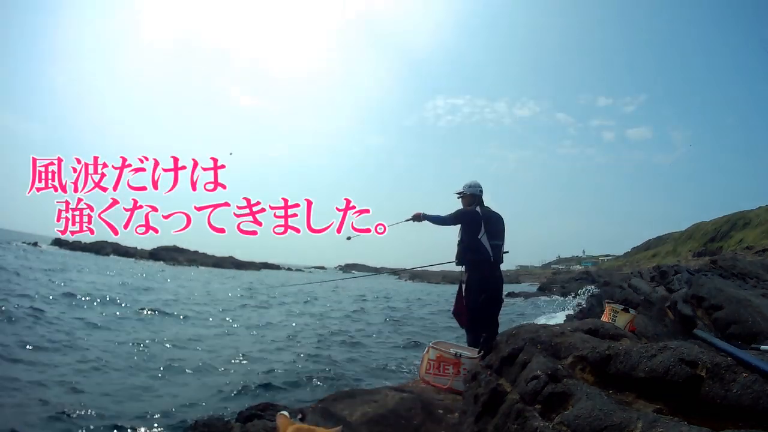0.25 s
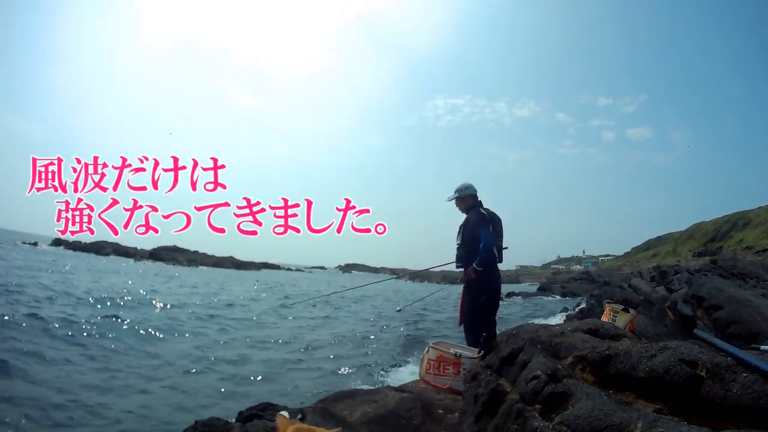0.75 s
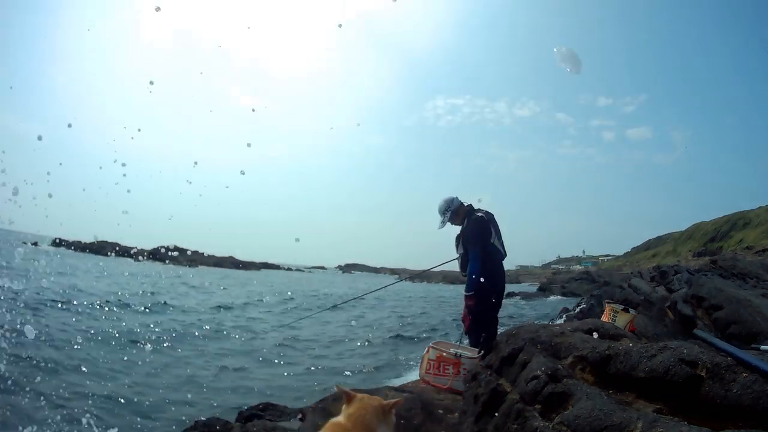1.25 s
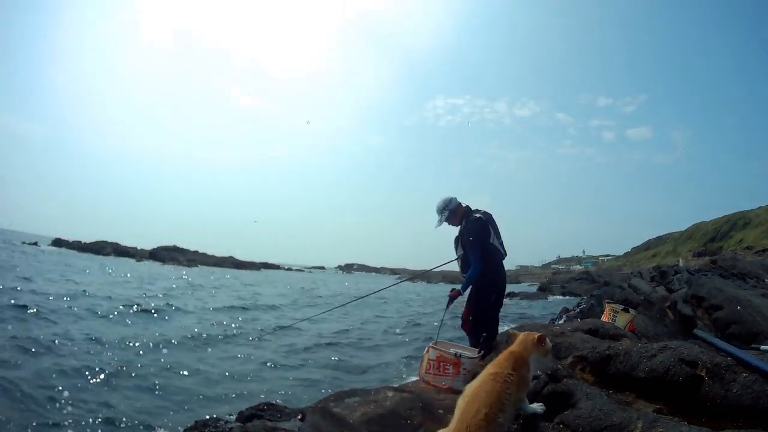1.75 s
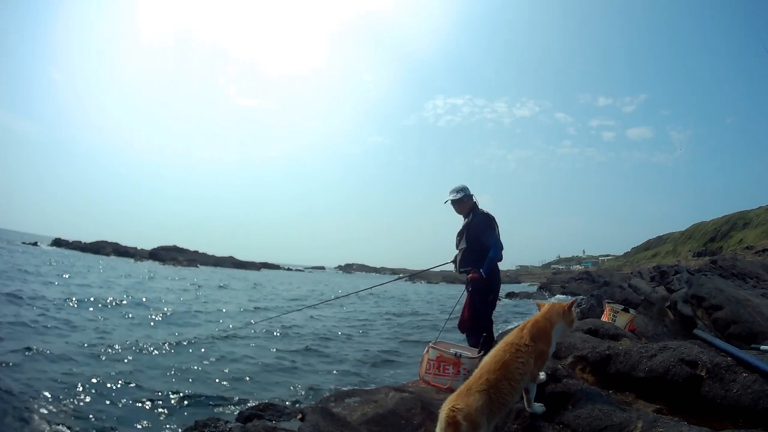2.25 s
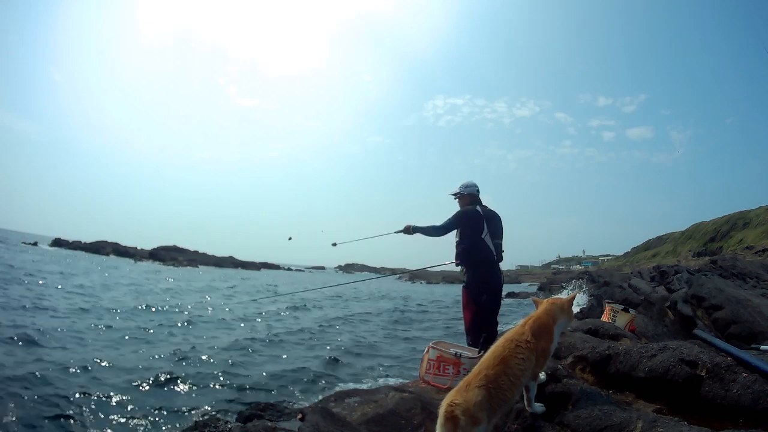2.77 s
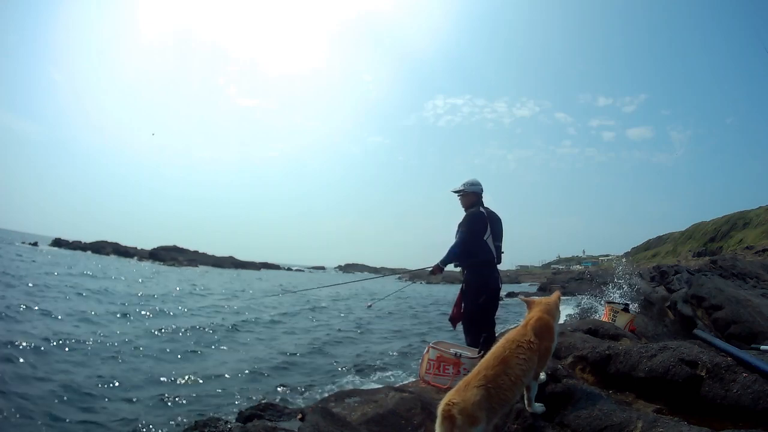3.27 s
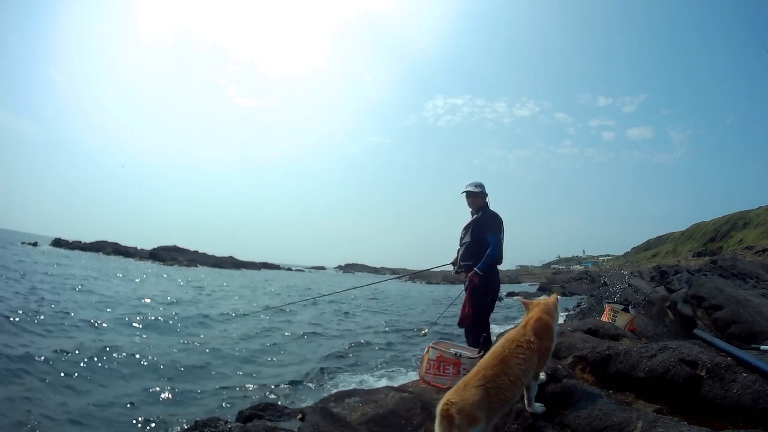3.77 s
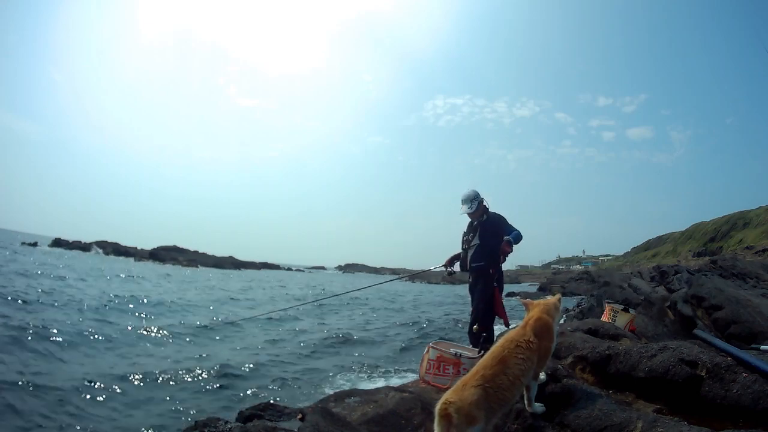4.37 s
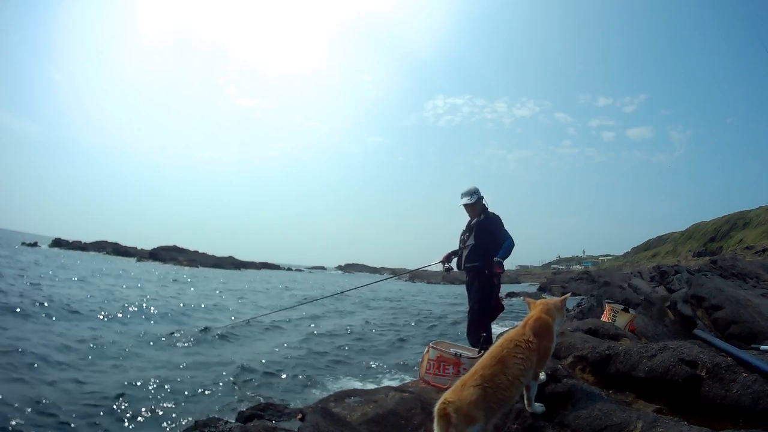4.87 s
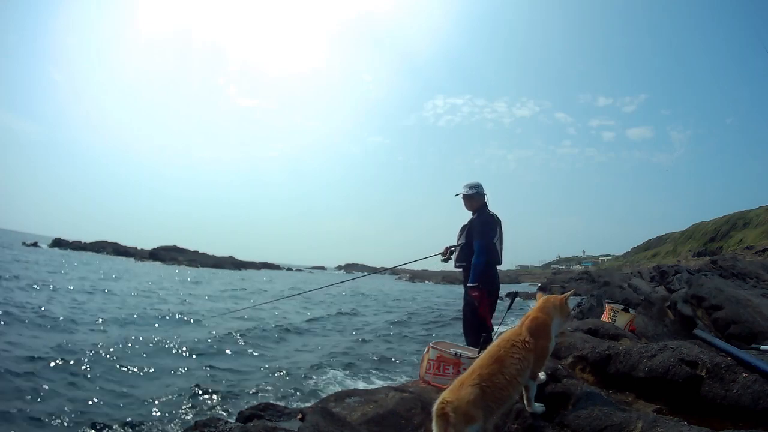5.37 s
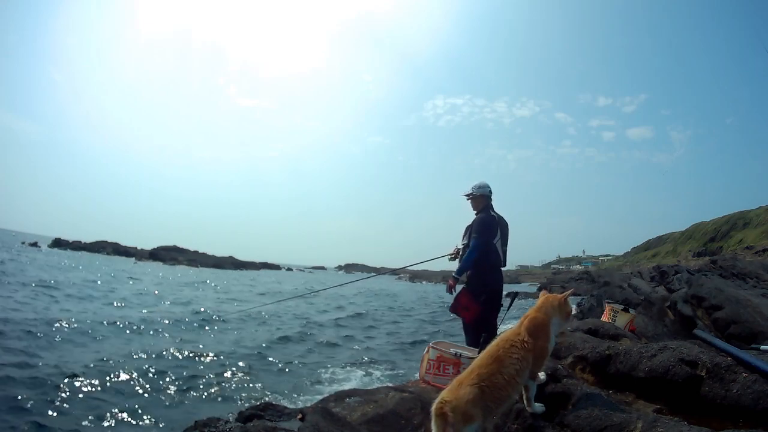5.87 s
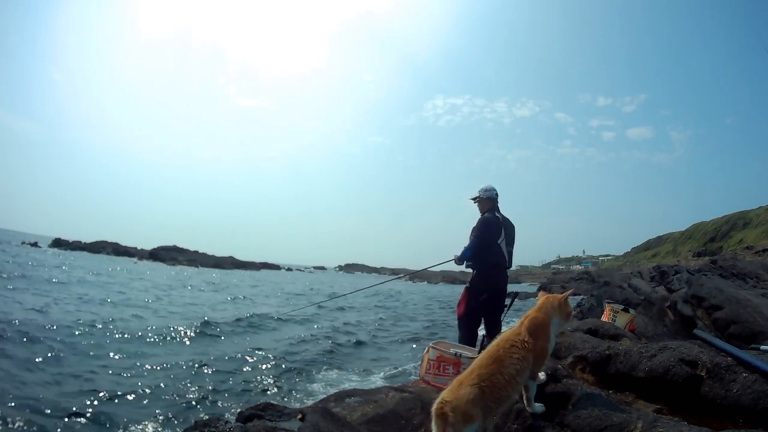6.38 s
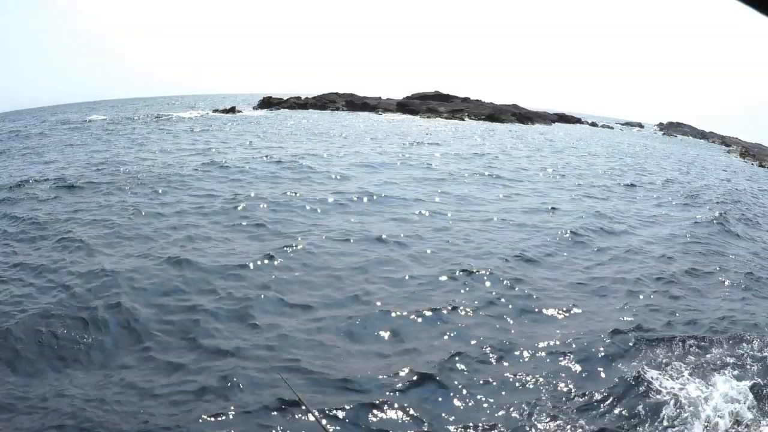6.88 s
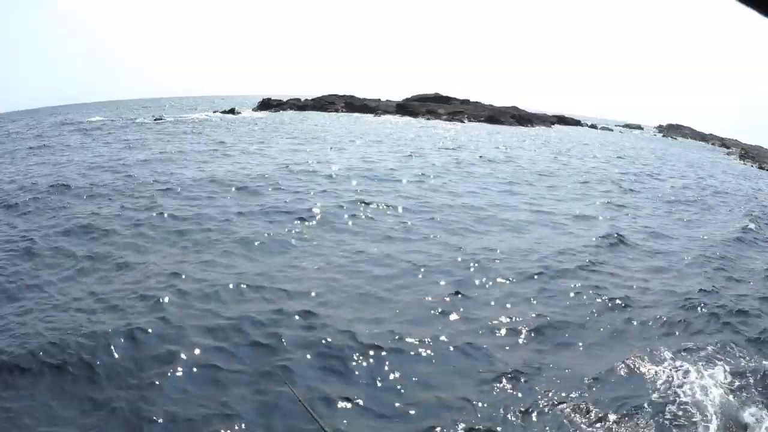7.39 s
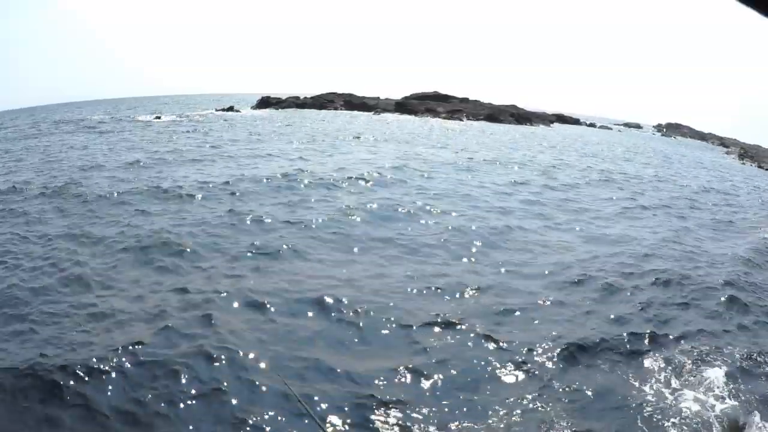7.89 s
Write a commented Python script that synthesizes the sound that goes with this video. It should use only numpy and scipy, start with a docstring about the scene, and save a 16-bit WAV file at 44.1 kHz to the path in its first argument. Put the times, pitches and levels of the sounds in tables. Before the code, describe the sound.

Wind rumbles on the microphone as surf roars in and slaps against rocks, followed by a brief shower of droplets landing nearby. The foamy wash slowly ebbs, with soft hollow gulps among the rocks, and fades away completely. A lighter, farther sound of open sea takes over, with small waves lapping, a few close drops and a growing foam hiss.

```python
"""A rocky shore in the wind, then choppy open water. Bubble clouds roar as a big wave surges up the
rocks and drains, while foam hisses above and wind rumbles on the microphone. Waves slap the rock,
air trapped in its hollows booms, and spray patters down nearby. The shore fades to silence, and the
open water fades in, thinner and more distant. Each place has its own microphone colour."""
import sys
import numpy as np
from scipy import signal
from scipy.fft import rfft, irfft
from scipy.io import wavfile

SR = 44100
rng = np.random.default_rng(int(sys.argv[2]) if len(sys.argv) > 2 else 0)


def materialize(psi):
    """Save the field psi as 16-bit PCM at rate SR to the path in sys.argv[1].

    A 1-D psi becomes a single channel; in a 2-D psi each row is a channel.
    """
    bounded = np.clip(np.atleast_2d(psi).T, -1, 1)
    quanta = np.round(bounded * 32767).astype(np.int16)
    wavfile.write(sys.argv[1], SR, quanta)


N = 358974
TIME = np.arange(N) / SR
LAP_FOAM_SHARE = 0.61  # share of a lap's lift in dB that its foam takes

# Small crests spilling into foam. Each row: peak time in seconds, level in dB, half length in seconds.
CRESTS = [(.59, -40, 0.031), (1.05, -35.5, 0.055), (4.44, -51, .1), (5.77, -50, .07), (7.53, -47.5, 0.1),
          (7.97, -44, 0.065)]


def gain_of(db):
    """The decibel scale: 20 dB is a factor of ten in amplitude."""
    return 10 ** (np.asarray(db) / 20)


def unit_rms(x):
    """Normalisation to a mean power of one."""
    return x / np.sqrt(np.mean(x ** 2) + 1e-20)


def shaped(x, spectrum):
    """Spectral shaping: x is filtered by a curve drawn on a log-frequency axis, then set to rms 1."""
    hz, db = np.transpose(spectrum)
    bins = np.fft.rfftfreq(N, 1 / SR)
    response = gain_of(np.interp(np.log(bins + 1), np.log(hz), db))
    return unit_rms(irfft(rfft(x) * response, N))


def microphone(x, modes):
    """Resonance of the microphone's housing adds bell-shaped peaks and notches."""
    bins = np.fft.rfftfreq(N, 1 / SR)
    db = sum(height / (1 + (2 * (bins - hz) / width) ** 2) for hz, width, height in modes)
    return irfft(rfft(x) * gain_of(db), N)


def blur(field, width, axis):
    """Gaussian smoothing correlates neighbouring values of a random field; the result has rms 1."""
    size = field.shape[axis]
    bell = np.exp(-2 * (np.pi * width * np.fft.rfftfreq(size)) ** 2)
    return unit_rms(irfft(rfft(field, axis=axis) * np.expand_dims(bell, 1 - axis), size, axis=axis))


def churn(x, patch_s, patch_hz, patch_db, flicker_db, size=512):
    """Turbulent modulation: patches of the spectrum come and go, and a flicker moves all pitches at once."""
    overlap = size - size // 4
    hz, t, spectra = signal.stft(x, SR, nperseg=size, noverlap=overlap)
    frames = patch_s / t[1]
    patches = blur(rng.standard_normal(spectra.shape), frames, axis=1)
    patches = blur(patches, patch_hz / hz[1], axis=0)
    flicker = blur(rng.standard_normal((1, len(t))), frames, axis=1)
    spectra = spectra * gain_of(patch_db * patches + flicker_db * flicker)
    return signal.istft(spectra, SR, nperseg=size, noverlap=overlap)[1][:N]


def bubbles(low_hz, high_hz, cycles, spread_db, count, size=900):
    """Damped oscillation: bubbles ring and rise in pitch as they near the surface; a few are large."""
    when, pitch, large = rng.random((count, 3)).T[:, :, None]
    hz = low_hz + (high_hz - low_hz) * pitch
    turns = hz * np.arange(size) / SR
    age = turns / cycles
    strength = gain_of(spread_db * np.minimum(-np.log(1 - large), 4)) * np.sqrt(hz)
    glide = 1 + 0.019 * np.minimum(age, 4)
    rings = strength * np.exp(-age) * np.sin(2 * np.pi * turns * glide)
    at = (when * N).astype(int) + np.arange(size)
    return unit_rms(np.bincount(at.ravel(), rings.ravel(), N)[:N])


def patter(per_s, spread_db):
    """Shot noise: droplets strike at random; a wide spread makes a few much harder than the rest."""
    chance, large, sign = rng.random((3, N))
    strength = gain_of(spread_db * np.minimum(-np.log(1 - large), 4))
    return unit_rms((chance < per_s / SR) * strength * np.sign(sign - .5))


def swells(rows):
    """Gaussian envelopes add, each falling to 1/e one half length from its peak."""
    return sum(gain_of(db) * np.exp(-((TIME - s) / half) ** 2) for s, db, half in rows)


def waver(depth_db, slow_hz, fast_hz, count=24):
    """Amplitude modulation: sines of random phase add up to a wandering gain."""
    rates = np.geomspace(slow_hz, fast_hz, count)[:, None]
    t = TIME[::256]
    phases = 2 * np.pi * (rates * t + rng.random((count, 1)))
    drift = (np.sin(phases) / np.sqrt(rates)).sum(0)
    return gain_of(depth_db * np.interp(TIME, t, unit_rms(drift)))


def lap_db():
    """Superposition: the lifts that smaller waves give to the water's sound add up, in dB."""
    # Waves lapping in. Each row: peak time in seconds, lift in dB, half length in seconds.
    laps = [(0.216, 2, 0.055), (0.483, 2.5, .04), (.6, 2.5, 0.028), (.79, 1.3, 0.073), (1.135, 2.3, 0.076),
            (2.42, 0.5, .12), (3.878, 1.5, 0.14), (4.478, 1.2, 0.11), (4.948, 2, 0.35), (5.78, 1.8, 0.36),
            (6.96, 1, 0.12), (7.292, 2, 0.064), (7.466, 1.5, 0.052), (7.767, 1.5, 0.081),
            (8.097, 0.2, 0.074)]
    return sum(db * np.exp(-((TIME - s) / half) ** 2) for s, db, half in laps)


def wind(breeze_db=-40, drop_db_per_s=0.9, gust_half_s=0.058):
    """Turbulent pressure rumbles on the microphone: a slowly dropping breeze with brief gusts."""
    # Spectrum of the rumble. Each row: frequency in Hz, relative density in dB.
    rumble = [(15, -13), (30, -7.5), (50, -7.5), (64, 4), (85, -2), (140, 2.5), (210, -0.5), (320, -16.5),
              (700, -40), (3000, -74)]
    # Gusts. Each row: peak time in seconds, level in dB.
    gusts = [(.44, -44), (.77, -43), (.98, -45.5)]
    level = gain_of(breeze_db - drop_db_per_s * TIME) + swells((s, db, gust_half_s) for s, db in gusts)
    eddies = churn(rng.standard_normal(N), patch_s=0.017, patch_hz=81.7, patch_db=-0.5, flicker_db=1.35)
    return level * shaped(eddies, rumble)


def open_water(build_s=7.3, build_db_per_s=7):
    """Bubble and droplet noise: small waves lap, and as a swell builds the foam outgrows the wash."""
    # Spectra of the wash and its foam. Each row: frequency in Hz, relative density in dB.
    wash_spectrum = [(20, -36), (110, -36), (200, -28), (300, -14), (450, -5.5), (620, -0.5), (950, 3),
                     (1400, 0), (2000, -2.5), (2400, -8.5), (3200, -15), (4300, -20.5), (7000, -24),
                     (16000, -39.5)]
    foam_spectrum = [(800, -19), (2000, 12), (4000, 10.5), (7000, -0.5), (10000, -3), (12000, -14),
                     (14000, -8), (15500, -4)]
    # Microphone resonances and notches. Each row: centre in Hz, width in Hz, gain in dB.
    open_modes = [(3600, 250, -6), (4590, 300, -17), (5200, 960, -10), (5720, 430, -22), (6900, 900, 3.5),
                  (8100, 800, -8), (10000, 1500, 13), (13200, 1200, -8)]
    swell_db = build_db_per_s * np.maximum(TIME - build_s, 0)
    slosh = waver(depth_db=-0.26, slow_hz=2.3, fast_hz=10)
    wash_level = gain_of(-39 + swell_db + lap_db()) * slosh
    seething = gain_of(-53 + 1.84 * swell_db + LAP_FOAM_SHARE * lap_db()) * slosh
    foam_level = np.hypot(seething, swells(CRESTS))
    wash = rng.standard_normal(N) + gain_of(-16.5) * bubbles(394, 4180, cycles=6.7, spread_db=3, count=2500)
    wash = churn(wash, patch_s=0.026, patch_hz=252, patch_db=1.5, flicker_db=0.36)
    froth = rng.standard_normal(N) + gain_of(-7) * patter(per_s=610, spread_db=4)
    froth = churn(froth, patch_s=0.0074, patch_hz=800, patch_db=1, flicker_db=1)
    water = wash_level * shaped(wash, wash_spectrum) + foam_level * shaped(froth, foam_spectrum)
    return microphone(water, open_modes)


def gulps():
    """Cavity resonance: air trapped in hollows of the rock booms softly as water closes over it."""
    # Gulps. Each row: peak time in seconds, level in dB, half length in seconds.
    booms = [(.78, -32, 0.038), (1.157, -35, .037), (1.78, -35, 0.06), (3.2, -38.5, 0.12),
             (4.42, -45, 0.17), (4.96, -36.5, 0.19)]
    # Spectrum of a hollow. Each row: frequency in Hz, relative density in dB.
    hollow = [(60, -40), (170, -7), (270, 1), (350, -0.5), (550, -9), (2000, -65)]
    return swells(booms) * shaped(rng.standard_normal(N), hollow)


def drops(size=2048):
    """Impact noise: each near drop is a click and a brief splatter in a band around its own pitch."""
    # Each row: time in seconds, peak in dB, pitch in Hz, width in octaves, decay in seconds.
    landings = [(1.415, -21, 2600, 0.4, 0.0013), (1.529, -25, 3200, .6, .0012),
                (1.641, -22, 3600, .5, 0.002), (1.979, -15, 1100, 0.36, 0.0043),
                (2.021, -24, 6500, 0.32, .001), (2.208, -15, 1740, 0.68, 0.001),
                (3.733, -30, 3100, 0.43, 0.0018), (4.162, -39, 7000, .3, .001),
                (5.605, -39, 5600, 0.077, .002), (6.736, -23, 1400, .6, .003),
                (6.947, -28, 1000, 0.66, .002), (7.083, -35, 2600, .3, .0015),
                (7.327, -33, 3030, 0.23, 0.0025), (7.787, -36, 13000, .3, .001)]
    out, bins = np.zeros(N + size), np.fft.rfftfreq(size, 1 / SR)
    age = (np.arange(size) - size // 2) / SR
    for s, db, hz, octaves, decay in landings:
        band = np.exp(-.5 * (np.log2((bins + 1) / hz) / octaves) ** 2)
        click = age == 0
        splatter = rng.standard_normal(size) * (age > 0) * np.exp(-abs(age) / decay)
        splat = irfft(rfft(click + gain_of(-15) * splatter) * band)
        out[round(s * SR) - size // 2:][:size] += gain_of(db) * splat / abs(splat).max()
    return out[:N]


def shower(start_s=1.12, peak_s=1.48, end_s=2.31, stop_s=0.1, fade_db_per_s=16):
    """Shot noise of thrown spray, ending as the highest droplets land. Returns sound and envelope."""
    # Spectrum of the droplets. Each row: frequency in Hz, relative density in dB.
    droplet = [(300, -22), (1200, 9), (2200, 3), (4200, -5.5), (6500, -5.5), (9000, -28), (12000, -11),
               (15000, -34)]
    rising = np.clip((TIME - start_s) / (peak_s - start_s), 0, 1)
    fading = gain_of(-fade_db_per_s * np.maximum(TIME - peak_s, 0))
    stopping = np.clip((end_s - TIME) / stop_s, 0, 1)
    level = gain_of(-37) * rising * fading * stopping
    return level * shaped(patter(per_s=300, spread_db=5), droplet), level


def slaps():
    """Impact: water hits the rock and bursts trapped air in a dying gush. Returns sound and envelope."""
    # Waves striking. Each row: start in seconds, level in dB, rise in seconds, decay in seconds.
    strikes = [(0.465, -24.5, 0.037, 0.021), (0.750, -29.5, 0.014, 0.048), (1.045, -20, 0.032, 0.018),
               (1.107, -22, 0.0036, 0.027), (1.572, -25, 0.0075, 0.042)]
    # Spectrum of a slap. Each row: frequency in Hz, relative density in dB.
    slap_spectrum = [(100, -16.5), (350, -4), (800, 0.5), (1150, -3), (1550, 5), (2200, -13.5), (3500, -24),
                     (6000, -24.5), (12000, -40), (16000, -51.5)]
    level = np.zeros(N)
    for s, db, rise, decay in strikes:
        age = TIME - s
        level += gain_of(db) * np.clip(age / rise, 0, 1) * np.exp(-np.maximum(age - rise, 0) / decay)
    gush = rng.standard_normal(N) + gain_of(-11) * patter(per_s=1100, spread_db=9)
    return level * shaped(gush, slap_spectrum), level


def surge_db(full_s=0.43, hold_s=0.61, rise_db_per_s=6, ebb_db_per_s=2):
    """Exponential growth and decay: the big wave climbs, holds and drains, in dB relative to its crest."""
    climbing = np.maximum(full_s - TIME, 0)
    draining = np.maximum(TIME - full_s - hold_s, 0)
    return -rise_db_per_s * climbing - ebb_db_per_s * draining


def fizz():
    """Fine shot noise of fresh foam, which dies sooner than the roar."""
    # Spectrum of the fizz. Each row: frequency in Hz, relative density in dB.
    fizz_spectrum = [(2000, -26), (6300, 0.5), (8500, -6.5), (12000, -7), (13500, -19), (16000, -22)]
    return gain_of(-51 + 2.56 * surge_db()) * shaped(patter(per_s=4000, spread_db=2.5), fizz_spectrum)


def foam(slosh, slap_level, shower_level):
    """Incoherent addition: the hiss of foam from waves, slaps, falling spray and crests sums in power."""
    # Spectrum of the hiss. Each row: frequency in Hz, relative density in dB.
    hiss = [(800, -4.5), (1800, 7.5), (3000, -5.5), (4200, 0), (6500, -8), (8200, -13.5), (12200, -11),
            (13200, -26), (15600, -30)]
    seething = gain_of(-46 + 0.58 * surge_db() + LAP_FOAM_SHARE * lap_db()) * slosh
    thrown = np.hypot(gain_of(-18.5) * slap_level, gain_of(3) * shower_level)
    level = np.sqrt(seething ** 2 + thrown ** 2 + swells(CRESTS) ** 2)
    spray = rng.standard_normal(N) + gain_of(-4) * patter(per_s=1500, spread_db=0)
    spray += gain_of(-10.5) * bubbles(1800, 8900, cycles=2.2, spread_db=5, count=4000)
    spray = churn(spray, patch_s=0.0062, patch_hz=700, patch_db=1.7, flicker_db=0.1)
    return level * shaped(spray, hiss)


def roar(slosh):
    """Bubble resonance: clouds of bubbles among the rocks merge into a roar that follows the waves."""
    # Spectrum of the roar. Each row: frequency in Hz, relative density in dB.
    roar_spectrum = [(40, -32), (150, -17.5), (260, -0.5), (600, 1), (950, -1), (1400, -1.5), (1800, -6.5),
                     (2300, -14.5), (3200, -19), (5000, -22.5), (9000, -43), (16000, -53)]
    level = gain_of(-26 + surge_db() + lap_db()) * slosh
    cloud = rng.standard_normal(N)
    cloud += gain_of(-16.5) * bubbles(222.7, 2358, cycles=4.4, spread_db=1, count=3000)
    cloud += gain_of(-6) * patter(per_s=700, spread_db=4)
    cloud = churn(cloud, patch_s=0.015, patch_hz=200, patch_db=0.5, flicker_db=0.75)
    return level * shaped(cloud, roar_spectrum)


def shore():
    """Superposition: wind and surf add at one microphone; roar and foam waver together."""
    # Microphone resonances and notches. Each row: centre in Hz, width in Hz, gain in dB.
    shore_modes = [(346, 47, 1.5), (470, 120, -1.5), (1260, 300, 3), (2280, 350, -3), (2760, 170, 3.5),
                   (3460, 430, -4.5), (5220, 570, -6.5), (5970, 900, 4), (11700, 1000, -0.5)]
    slosh = waver(depth_db=-0.07, slow_hz=3, fast_hz=10)
    slapping, slap_level = slaps()
    falling_spray, shower_level = shower()
    surf = roar(slosh) + foam(slosh, slap_level, shower_level) + fizz()
    return microphone(wind() + gulps() + falling_spray + slapping + surf, shore_modes)


def scene(fade_out_s=5.105, silent_s=6.605, faded_in_s=7.105):
    """Linear fades: the shore leaves, then the open water arrives; near drops land in both."""
    leaving = np.interp(TIME, [fade_out_s, silent_s], [1, 0])
    arriving = np.interp(TIME, [silent_s, faded_in_s], [0, 1])
    return (leaving * shore() + arriving * open_water() + (leaving + arriving) * drops())[None]


def record(dry, edge_hz=15700):
    """Band limiting: a steep low-pass filter removes the highest treble."""
    lowpass = signal.firwin(1023, edge_hz, window=("kaiser", 9), fs=SR)
    return signal.oaconvolve(dry, lowpass[None], "same")


dry = scene()
out = record(dry)
materialize(out)
```